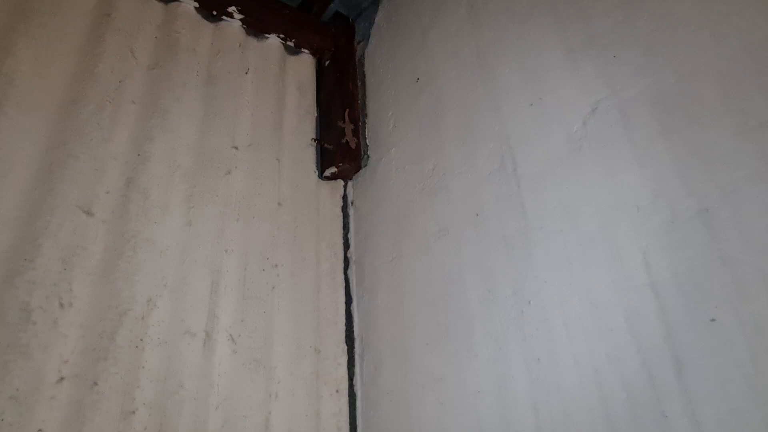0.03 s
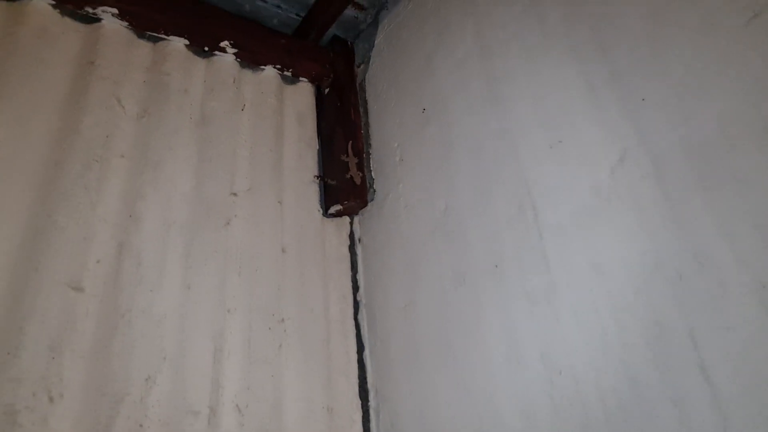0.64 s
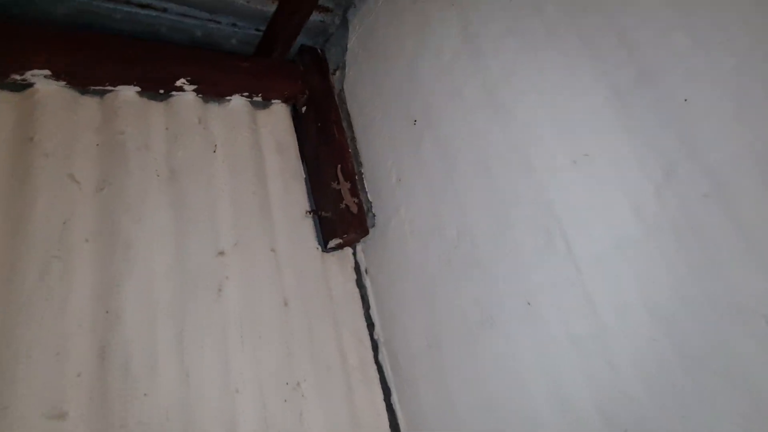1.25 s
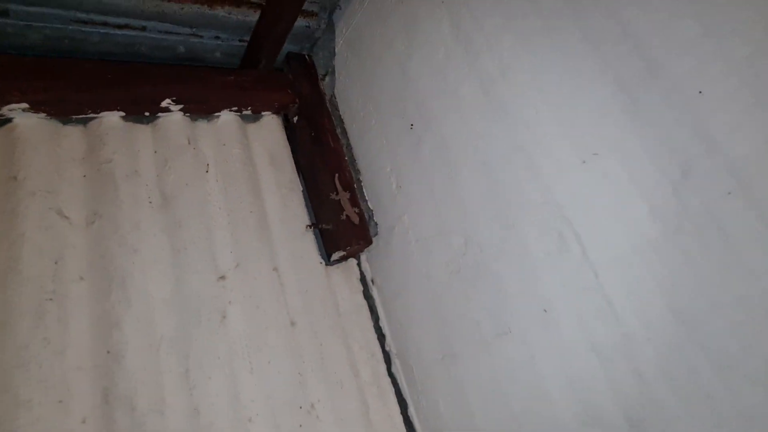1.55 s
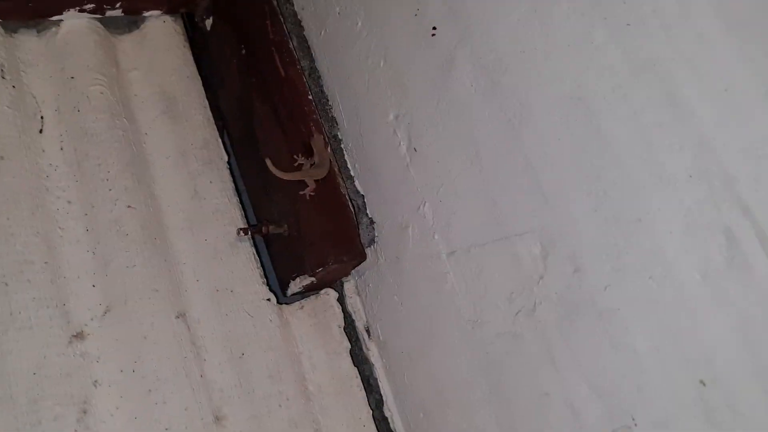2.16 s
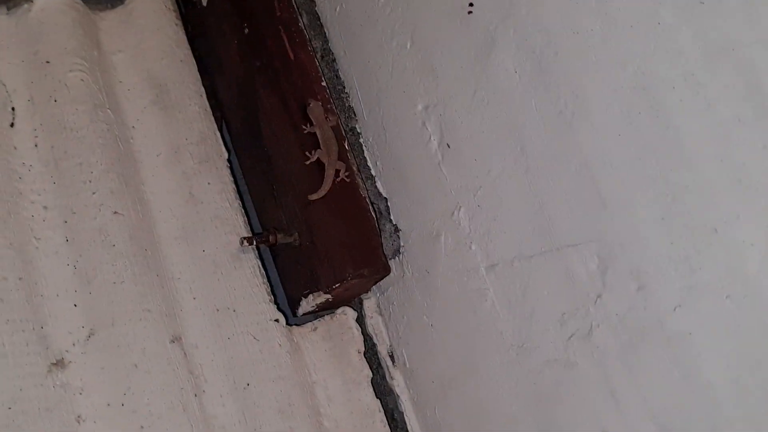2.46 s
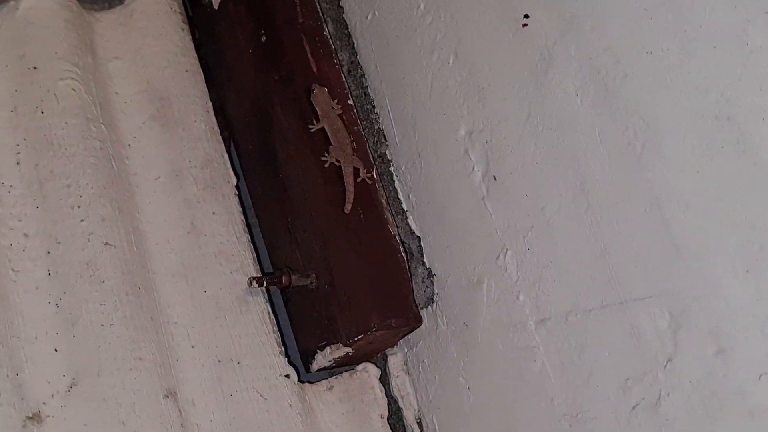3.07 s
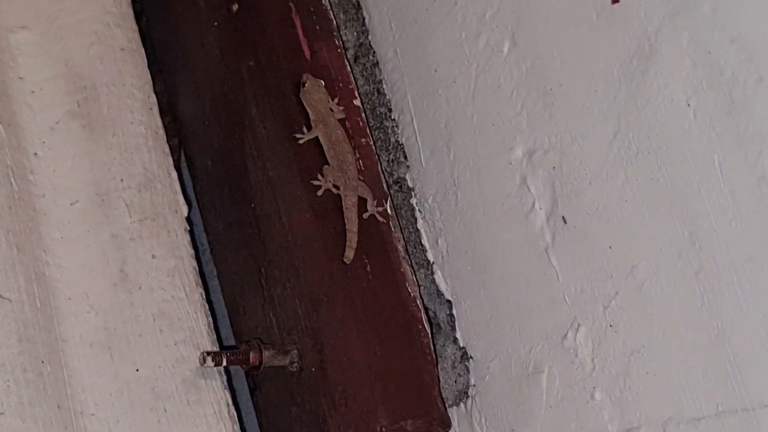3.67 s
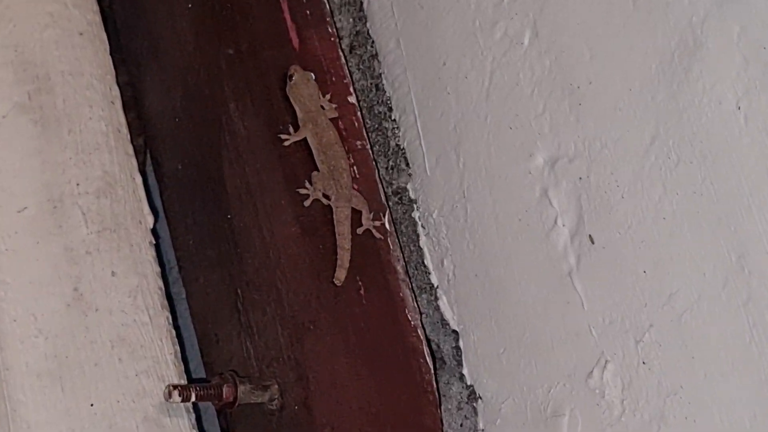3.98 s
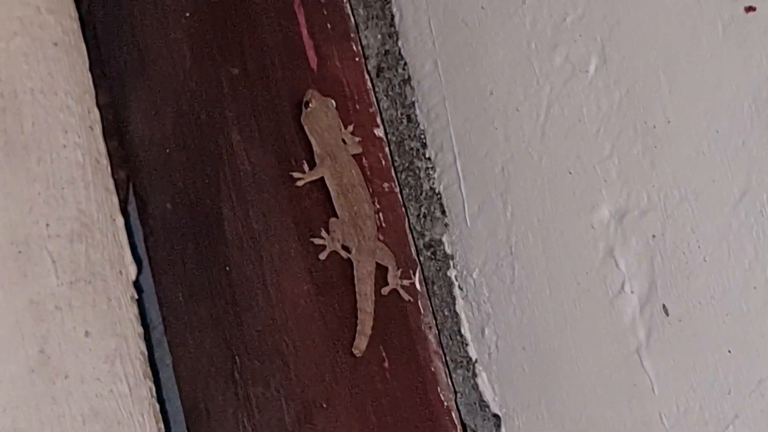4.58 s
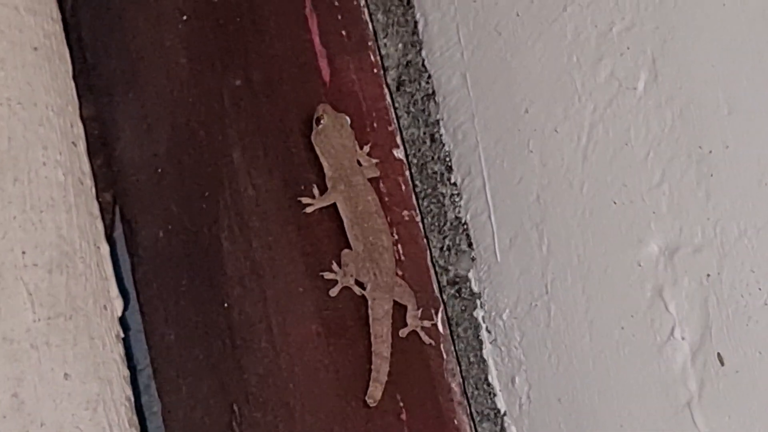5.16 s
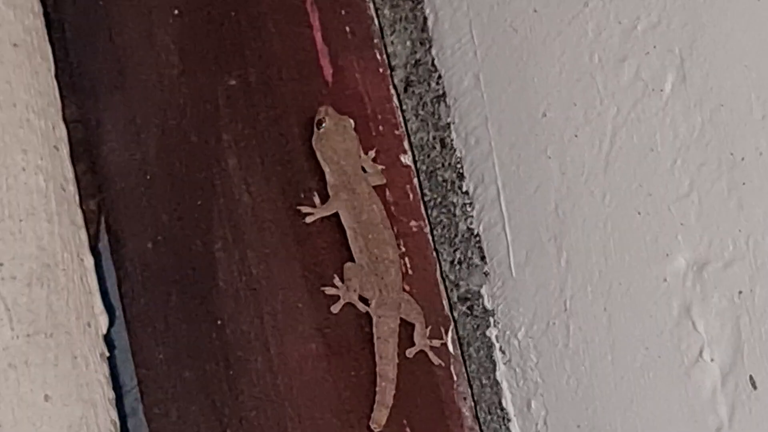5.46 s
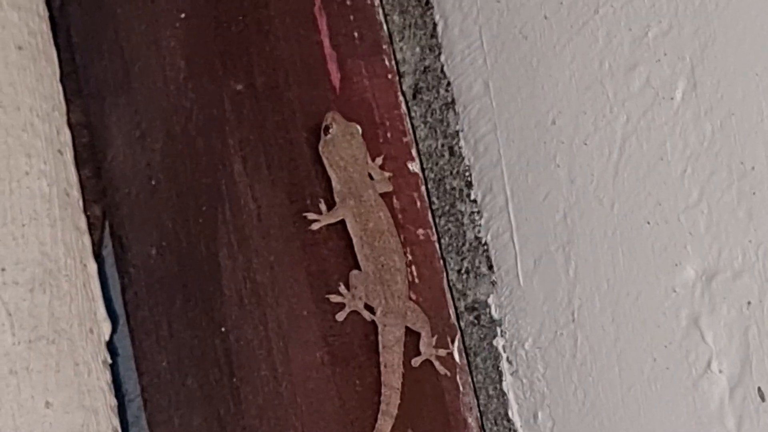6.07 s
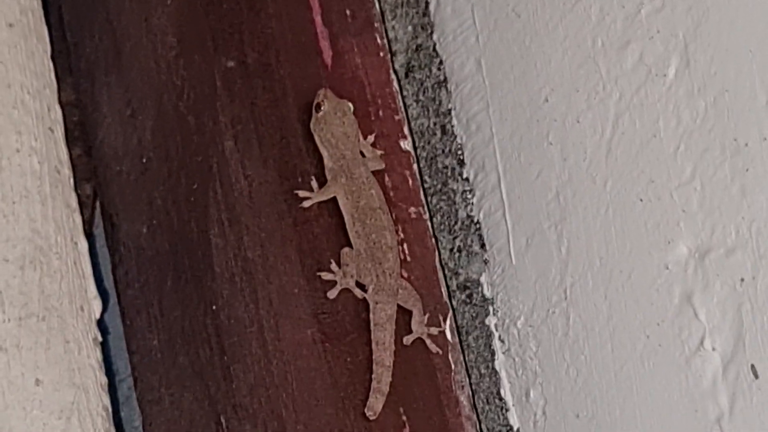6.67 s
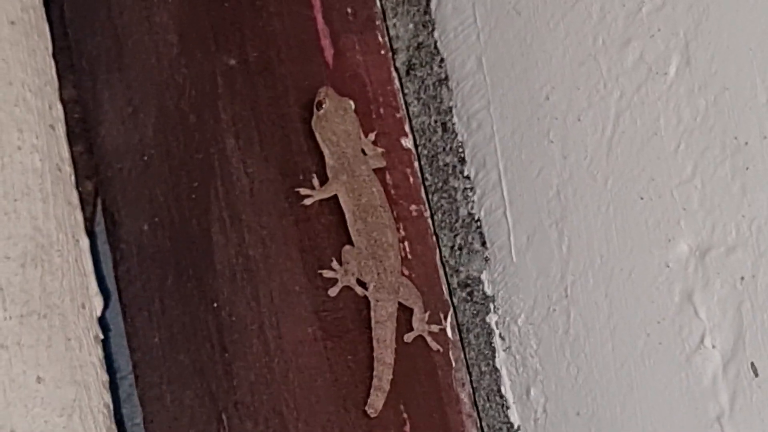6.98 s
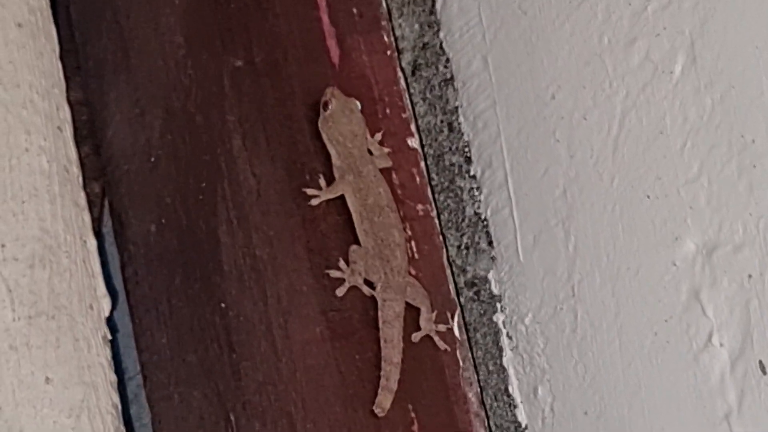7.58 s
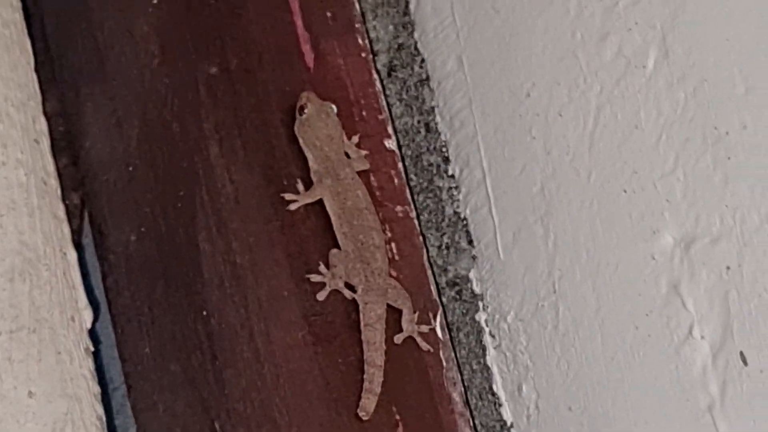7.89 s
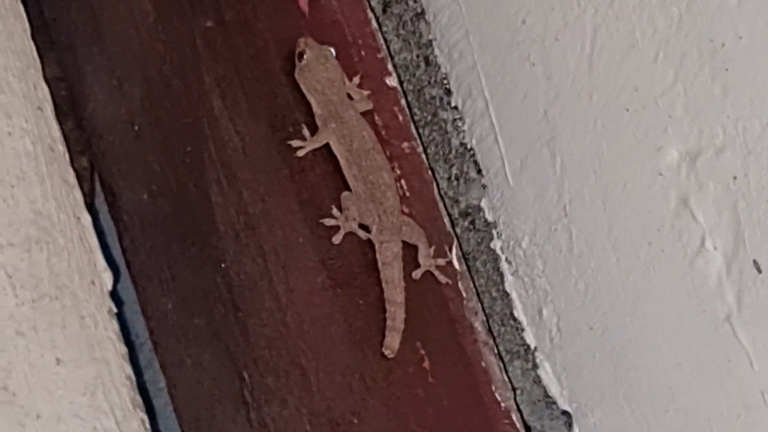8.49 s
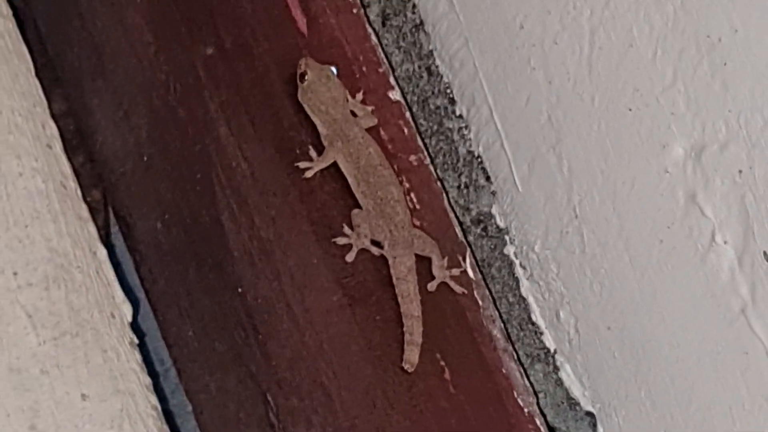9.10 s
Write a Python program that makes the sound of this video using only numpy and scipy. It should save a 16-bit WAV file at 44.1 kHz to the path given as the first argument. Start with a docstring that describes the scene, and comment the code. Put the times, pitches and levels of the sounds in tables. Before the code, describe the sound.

Rain washes over a sheet roof with splatting drips, as the low, throbbing boom of an approaching engine swells outside.

```python
"""Rain on a sheet roof, vehicle approaching

Heard from a walled corner under the eaves. Fine drops merge into a wash, heavy drips splat,
the sheet rings briefly, and the bare walls add a short tail. A vehicle draws near outside:
its deep exhaust note booms in the corner, then its road roar comes through."""
import sys
import numpy as np
from scipy import signal
from scipy.fft import rfft, irfft, next_fast_len
from scipy.io import wavfile
from scipy.ndimage import uniform_filter1d, minimum_filter1d

SR = 44100
rng = np.random.default_rng(int(sys.argv[2]) if len(sys.argv) > 2 else 0)


def write(x):
    x = np.atleast_2d(x).T
    wavfile.write(sys.argv[1], SR, np.round(np.clip(x, -1, 1) * 32767).astype(np.int16))


N = 411894


# roof wash spectrum: f/Hz, density/dB
WASH_SPECTRUM = [(60, -29), (130, 0), (210, -2), (260, -1), (400, -1), (520, 1.5), (700, 1.5), (980, -2),
                 (1350, 0.5), (2300, -3), (3500, -9), (6500, -14), (9500, -28.5), (15800, -41)]

def wash(body_db, level_db=2):
    """Countless fine drops all over the roof merge."""
    drops = shower(per_s=900, spread_db=2)
    patter = unit_rms(spatter(drops, t60_s=0.021, tail_t60_s=0.19, tail_db=-7, grain_db=2))
    return gain(body_db + level_db) * at_ears(patter, WASH_SPECTRUM)


# heaviest drips, close by: t/s, spray/dB, splat/dB
HEAVY_DRIPS = [(0.225, -46, -43), (0.504, -42, -41), (0.782, -49, -41), (1.266, -43, -40),
               (1.433, -42.5, -54), (1.914, -41.5, -44), (1.954, -44, -36.5), (2.133, -41, -40.5),
               (2.235, -43.5, -43.5), (2.54, -41.5, -40.5), (3.259, -44, -38), (3.51, -39, -39),
               (4.035, -39.5, -36.5), (4.161, -43, -35.5), (4.21, -37, -45), (4.36, -45, -32.5),
               (4.537, -36.5, -37), (4.705, -37.5, -37.5), (4.843, -36.5, -37.5), (4.865, -41, -48),
               (5.106, -40, -37), (5.356, -37, -37), (5.593, -37, -37.5), (5.657, -34, -50),
               (5.821, -38.5, -32.5), (5.893, -38, -41), (5.998, -37.5, -37), (6.378, -39, -38),
               (6.405, -36.5, -50), (6.701, -37, -36), (6.721, -38.5, -36), (7.144, -38.5, -51),
               (8.213, -41, -49), (8.359, -41, -41), (8.666, -43, -36), (9.181, -38, -37),
               (9.207, -37, -38)]
# spectra of the spray and of the slap on the sheet: f/Hz, density/dB
SPRAY_SPECTRUM = [(600, -23), (1500, -7.5), (2300, -6), (3200, 1.5), (4300, -1.5), (6300, 0), (7400, -3),
                  (8200, -4.5), (9600, -8), (12500, -6), (14500, -9.5), (15800, -14)]
SPLAT_SPECTRUM = [(200, -24), (450, 1), (700, 1), (980, -3.5), (1400, 1.5), (2200, -1), (3100, -4.5),
                  (4500, -11), (9000, -30)]

def drips(lesser_rows, spray_db=0.4, splat_db=0.5):
    """Each drip, heavy or lesser, throws bright spray and slaps the sheet as it spreads."""
    rows = np.vstack([HEAVY_DRIPS, lesser_rows])
    spray_hits, splat_hits = impulses(rows[:, [0, 1]]), impulses(rows[:, [0, 2]])
    spray = spatter(spray_hits, t60_s=0.2, tail_t60_s=0.11, tail_db=-5.5, grain_db=-1)
    splat = spatter(splat_hits, t60_s=0.23, tail_t60_s=0.41, tail_db=-4, grain_db=2.5, rise_s=0.0064)
    return (gain(spray_db) * at_ears(spray, SPRAY_SPECTRUM)
            + gain(splat_db) * at_ears(splat, SPLAT_SPECTRUM))


def lesser_drips(body_db, spray_db, per_s=7, jitter_s=0.065, spread_db=2.5, count=100):
    """The eaves drip unevenly, as strongly as it rains. Returns rows of t/s, spray/dB, splat/dB."""
    late, spray, splat = rng.uniform(-1, 1, (count, 3)).T
    t = np.arange(count) / per_s + jitter_s * late
    at = np.clip(t * SR, 0, N - 1).astype(int)
    rows = np.transpose([t, spray_db[at] + 2 + spread_db * spray, body_db[at] + 0.7 + spread_db * splat])
    return rows[t < N / SR]


def splashes(spray_db, level_db=-1.5):
    """Water running off the eaves breaks on the ground in many small splashes."""
    drops = shower(per_s=200, spread_db=4.5)
    bursts = unit_rms(spatter(drops, t60_s=0.1, tail_t60_s=0.36, tail_db=-5, grain_db=0.5))
    return gain(spray_db + level_db) * at_ears(bursts, SPRAY_SPECTRUM)


# blunt drops: t/s, level/dB
KNOCK_HITS = [(0.199, -29), (0.234, -29), (1.265, -48), (1.929, -30), (1.979, -32), (4.234, -21),
              (4.364, -38), (4.719, -24), (5.107, -28), (5.189, -20.5), (5.206, -34), (6.399, -30)]
# their thud: f/Hz, density/dB
KNOCK_SPECTRUM = [(150, -23), (400, 1), (700, -5.5), (1000, -7), (1500, -6.5), (2500, -7.5), (3500, -20),
                  (6000, -27)]

def knocks(level_db=-8):
    """Big drops thud on the damped sheet."""
    hits = impulses(KNOCK_HITS)
    thuds = spatter(hits, t60_s=0.16, tail_t60_s=0.35, tail_db=-11, grain_db=1.5, rise_s=0.006)
    return gain(level_db) * at_ears(thuds, KNOCK_SPECTRUM)


def pings(body_db, level_db=-7, low_hz=1080, high_hz=3000, t60_s=0.12, rise_s=0.0027, count=1800):
    """Each patch of the sheet rings briefly at its own pitch when a drop hits it."""
    t = np.arange(SR // 12) / SR
    out = np.zeros((2, N + len(t)))
    envelope = gain(-60 * t / t60_s) * (1 - np.exp(-t / rise_s))
    for when, patch, size, left_phase, right_phase in rng.random((count, 5)):
        hz = low_hz * (high_hz / low_hz) ** patch
        ring = np.sin(2 * np.pi * (hz * t + np.array([[left_phase], [right_phase]])))
        at = int(when * N)
        out[:, at:at + len(t)] += size ** 2 * envelope * ring / np.sqrt(hz)
    return gain(body_db + level_db) * unit_rms(out[:, :N]) * gain([[-1], [1]])


def ticks(spray_db, level_db=-13):
    """Stray droplets land beside the listener as tiny, very bright ticks."""
    clicks = unit_rms(np.array([shower(per_s=140, spread_db=7.5) for ear in range(2)]))
    spectrum = [(2000, -30), (7000, -14), (9500, -2), (12500, -3), (15800, 2)]
    return gain(spray_db + level_db) * at_ears(clicks, spectrum)


# engine firing rate: t/s, f/Hz
FIRING_RATE = [(0, 68.2), (.6, 66.8), (1.4, 61.2), (1.8, 63.6), (4.3, 62.42), (7.0, 63.32), (8.0, 62.26),
               (8.4, 62.58), (9.2, 62.33)]
# exhaust fundamental in the corner: t/s, level/dB
BOOM_LEVEL = [(0, -38.5), (1.5, -41.5), (3.05, -41.5), (3.44, -24), (3.68, -38), (4.14, -20), (4.3, -33.5),
              (4.57, -15.5), (4.73, -31), (4.97, -18), (5.1, -21), (5.17, -41.5), (5.53, -36.5),
              (5.61, -22.5), (5.8, -16.5), (6.72, -7), (7.42, -15.5), (7.95, -14.5), (8.2, -5.5),
              (8.35, -6.5), (8.58, -15), (8.65, -24.5), (9.03, -9.5), (9.3, -23.5)]
# exhaust overtones: harmonic number, relative level/dB
GROWL_HARMONICS = [(3, -16.5), (4, -20), (5, -18), (6, -15), (9, -20), (10, -20), (11, -15.5)]

def exhaust(roar_db, octave_db, flutter_db=0.43, flicker_db=4.5, sway_rad=0.12, waver_rad=0.64,
            throb_hz=2.95, throb_db=-43, throb_peak_s=0.18):
    """A nearly pure, fluttering firing note; its weak overtones waver on their way round the walls."""
    (firing_hz,), (boom_db,) = curves(FIRING_RATE), curves(BOOM_LEVEL)
    phase = 2 * np.pi * np.cumsum(firing_hz) / SR
    # constant depth: plain only while the vehicle is far
    throb = gain(throb_db) * np.cos(2 * np.pi * throb_hz * (np.arange(N) / SR - throb_peak_s))
    amplitude = gain(boom_db - 0.3 + flutter_db * drift(top_hz=21.63)) + throb
    # standing wave in the corner: leans right when faint, nears the centre as it swells
    balance_db = np.interp(boom_db, [-21.5, -6.5], [-4.5, -1.5])
    pan = gain(np.array([balance_db, -balance_db]) / 2)
    boom = amplitude * pan * np.sin(phase + sway_rad * drift(top_hz=12))
    octave = gain(octave_db - 2) * np.sin(2 * phase + waver_rad * drift())
    growl = np.zeros(N)
    for harmonic, relative_db in GROWL_HARMONICS:
        level = gain(roar_db + 1 + relative_db + flicker_db * drift())
        growl += level * np.sin(harmonic * phase + waver_rad * drift())
    return np.sqrt(2) * (boom + octave + growl * gain([[-2], [2]]))


# spectra of far traffic in the corner's low resonance and of road roar: f/Hz, density/dB
RUMBLE_SPECTRUM = [(12, -19), (22, -12), (35, -8), (47, -2), (62, 0), (79, -1), (93, -6), (112, -12),
                   (140, -18), (200, -31), (400, -60)]
ROAR_SPECTRUM = [(90, -6.5), (180, -13), (215, -18), (250, -3.5), (320, 1), (400, 0.5), (520, -8.5),
                 (620, -4.5), (710, -4.5), (760, -4), (950, -17), (2000, -39)]

def road(rumble_db, roar_db, swell_band_hz=(39, 76)):
    """Traffic rumble over a deep swell, and the roar that grows as the vehicle nears."""
    rumble = gain(rumble_db) * at_ears(white(), RUMBLE_SPECTRUM)
    # the longest waves reach both ears in phase
    band = signal.butter(2, swell_band_hz, "bandpass", fs=SR, output="sos")
    deep = unit_rms(signal.sosfilt(band, white()[0]))
    swell = gain(rumble_db) * deep * gain([[-6], [-2]])
    roar = gain(roar_db) * at_ears(white(), ROAR_SPECTRUM)
    return rumble + swell + roar


# near walls: nominal delay/ms, level/dB
WALL_ECHOES = [(2.9, -23), (7.1, -23), (13.3, -21), (21.7, -20), (34, -20)]

def corner(rain):
    """Near walls return the rain a moment later, differently at each ear, and comb its colour."""
    out = rain.copy()
    for delay_ms, level_db in WALL_ECHOES:
        for ear in range(2):
            lag = int(delay_ms * rng.uniform(0.85, 1.15) * SR / 1000) + 1
            out[ear, lag:] += gain(level_db) * rain[ear, :-lag]
    return out


# likeness of the ears: f/Hz, correlation (clipped to +-1 in use)
EAR_CORRELATION = [(60, 0), (160, 1.5), (220, 0.4), (420, 0.9), (680, 0.23), (900, 0.17), (1300, -0.34),
                   (2300, 0.17), (3400, -0.18), (5000, -0.04), (15000, 0)]
# balance: f/Hz, left minus right/dB
EAR_BALANCE = [(60, -4.5), (130, -6), (300, -6), (500, -0.5), (700, -4), (1400, -2.5), (3000, -2),
               (4500, -3), (6500, -5), (7900, 1), (9000, 2), (11500, -6.5), (15000, -6)]

def at_ears(pair, spectrum):
    """Colours two independent white signals and sets their correlation and balance."""
    size = next_fast_len(N + 4096)
    hz = np.fft.rfftfreq(size, 1 / SR)
    shared, separate = rfft(pair, size)
    correlation = np.clip(log_interp(EAR_CORRELATION, hz), -1, 1)
    balance_db = log_interp(EAR_BALANCE, hz)
    left = shared * gain(balance_db / 2)
    right = (correlation * shared + np.sqrt(1 - correlation ** 2) * separate) * gain(-balance_db / 2)
    colour = unit_rms(gain(log_interp(spectrum, hz)))
    return irfft(np.array([left, right]) * colour, size)[:, :N]


def spatter(hits, t60_s, tail_t60_s, tail_db, grain_db, rise_s=0):
    """Each hit bursts into droplets that die fast; the walls add a smooth tail."""
    t = np.arange(SR // 2) / SR
    rise = np.minimum((t + 1 / SR) / (rise_s + 1 / SR), 1)

    def envelope(decay_s):
        power = signal.oaconvolve(hits ** 2, rise * gain(-60 * t / decay_s) ** 2)[:N]
        return np.sqrt(np.abs(power))

    noise = white()
    grains = np.minimum(rng.exponential(1, N // 6 + 1), 5)
    droplets = unit_rms(noise * gain(grain_db * np.repeat(grains, 6)[:N]))
    return envelope(t60_s) * droplets + gain(tail_db) * envelope(tail_t60_s) * white()


def shower(per_s, spread_db):
    """Drops at random moments: many small, a few large."""
    return (rng.random(N) < per_s / SR) * gain(spread_db * np.minimum(rng.exponential(1, N), 3))


def impulses(rows):
    """One impulse per row of t/s, level/dB."""
    hits = np.zeros(N)
    for t, level_db in rows:
        hits[int(np.clip(t * SR, 0, N - 1))] += gain(level_db)
    return hits


def drift(top_hz=7):
    """Slow random wander, rms 1."""
    t = np.arange(N) / SR
    cycles = np.geomspace(1, top_hz, 10) * t[::256, None] + rng.random(10)
    return np.interp(t, t[::256], unit_rms(np.sin(2 * np.pi * cycles).sum(1)))


def white():
    """White noise for each ear."""
    return rng.standard_normal((2, N))


def curves(rows):
    """Each column of a time table at every sample."""
    t, *columns = np.transpose(rows)
    return [np.interp(np.arange(N) / SR, t, column) for column in columns]


def log_interp(rows, hz):
    """Interpolates on a log-frequency axis."""
    row_hz, value = np.transpose(rows)
    return np.interp(np.log(hz + 1), np.log(row_hz + 1), value)


def gain(db):
    """Decibels to amplitude."""
    return 10 ** (np.asarray(db) / 20)


def unit_rms(x):
    """Scales to rms 1."""
    return x / np.sqrt(np.mean(x ** 2) + 1e-20)


# rain strength: t/s, body/dB, spray/dB
RAIN_LEVELS = [(0.16, -39, -52), (0.7, -45.5, -50), (1.3, -43.5, -47), (2.7, -46, -47), (3.7, -42, -43),
               (4.3, -43, -43.5), (5.3, -40.5, -42.5), (5.7, -43.5, -45), (6.55, -39, -41.5),
               (7.05, -42, -44.5), (7.7, -40.5, -42), (8.7, -39.5, -41), (9.34, -41.5, -45)]
# vehicle approach: t/s, rumble/dB, road roar/dB, exhaust octave/dB
VEHICLE_LEVELS = [(0, -44.5, -58, -72), (2.8, -45, -51, -72), (4.3, -40.5, -48.5, -52),
                  (5.5, -39.5, -47.5, -47.5), (6.3, -31.5, -48, -40), (7.1, -29, -46.5, -43),
                  (7.6, -30, -40.5, -30), (8.35, -26.5, -38, -33), (8.85, -33.5, -38, -50),
                  (9.34, -29.5, -41.5, -41)]

def scene():
    """Rain all round, traffic beyond the wall."""
    body_db, spray_db = curves(RAIN_LEVELS)
    rumble_db, roar_db, octave_db = curves(VEHICLE_LEVELS)
    lesser_rows = lesser_drips(body_db, spray_db)
    rain = wash(body_db) + pings(body_db) + splashes(spray_db) + drips(lesser_rows) + knocks()
    return corner(rain) + ticks(spray_db) + exhaust(roar_db, octave_db) + road(rumble_db, roar_db)


def record(dry, silence_s=0.15, fade_s=0.025, ceiling=0.86, cutoff_hz=15900):
    """Brief silence and fade-in, a gentle peak limiter, then a low-pass."""
    fade_in = np.clip((np.arange(N) / SR - silence_s) / fade_s, 0, 1)
    needed_gain = ceiling / np.maximum(np.abs(dry).max(0), ceiling)
    limiter = uniform_filter1d(minimum_filter1d(needed_gain, size=2048), size=2048)
    lowpass = signal.firwin(511, cutoff_hz, window=("kaiser", 9), fs=SR)
    return signal.oaconvolve(dry * fade_in * limiter, lowpass[None], "same")


dry = scene()
out = record(dry)
write(out)
```